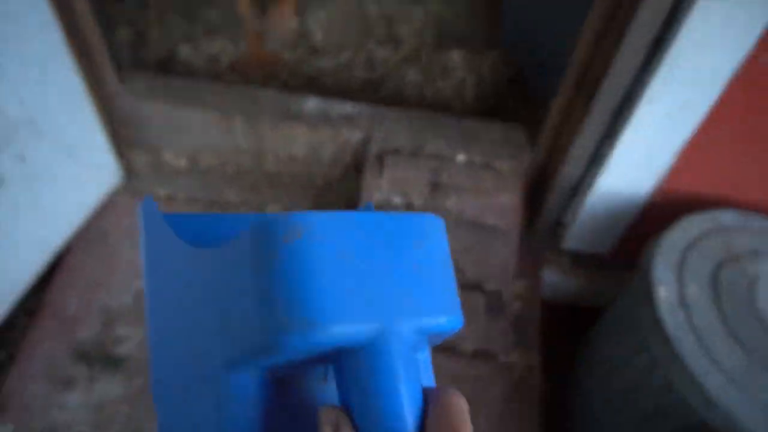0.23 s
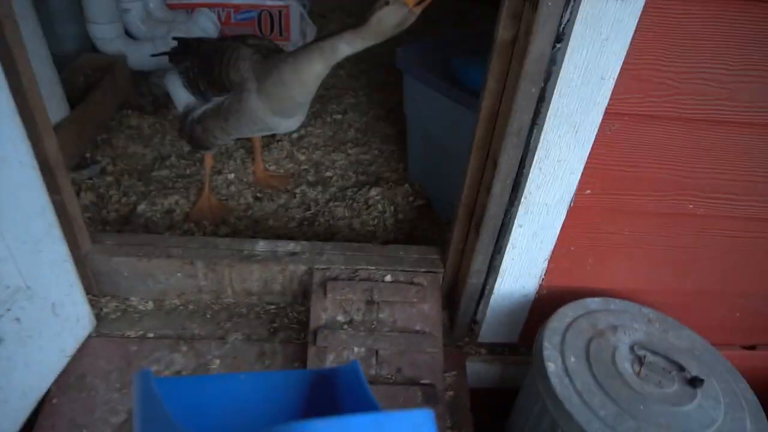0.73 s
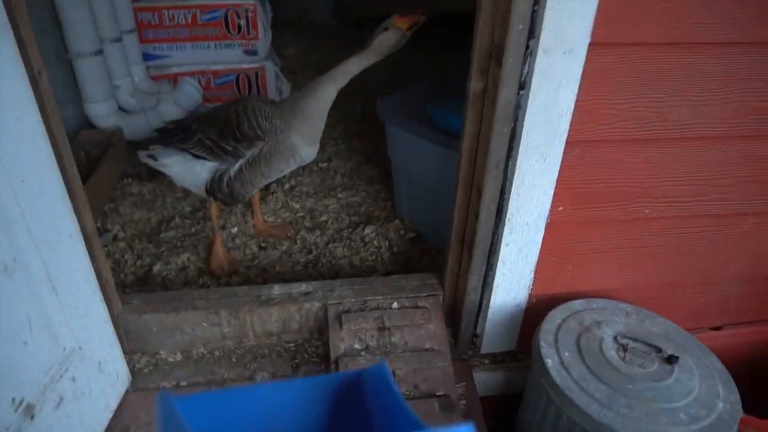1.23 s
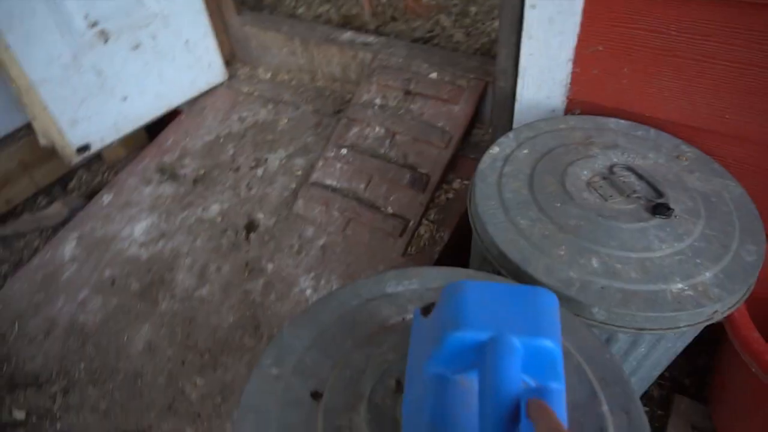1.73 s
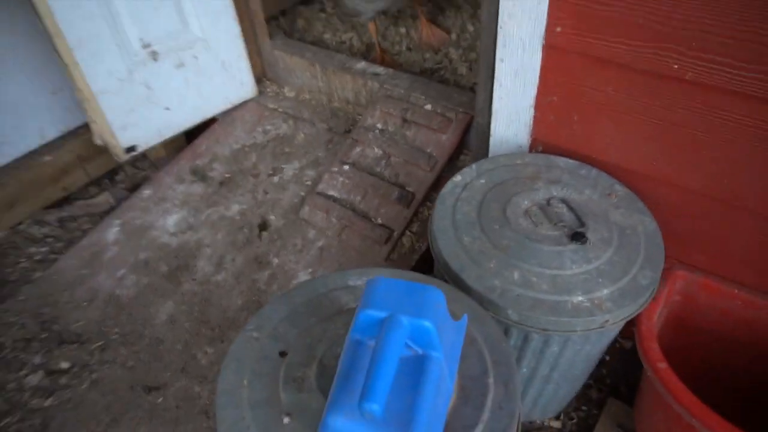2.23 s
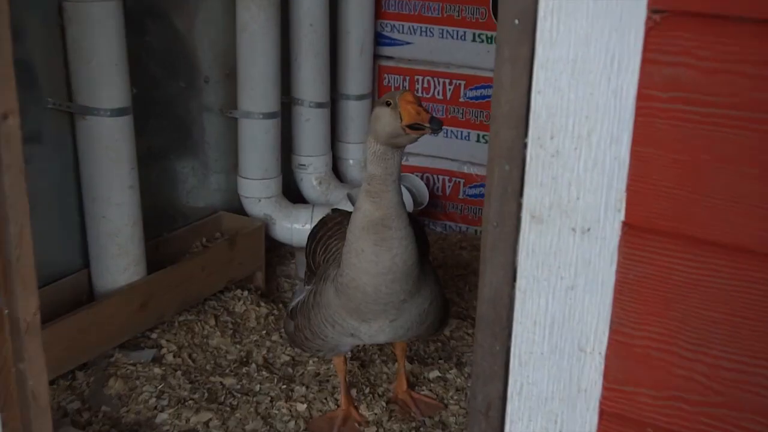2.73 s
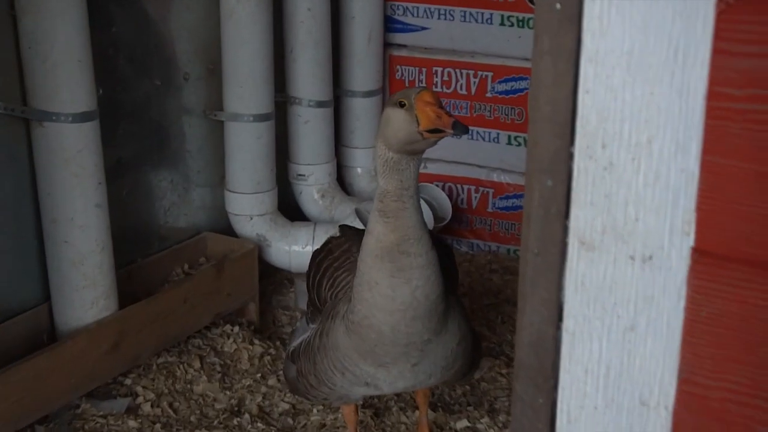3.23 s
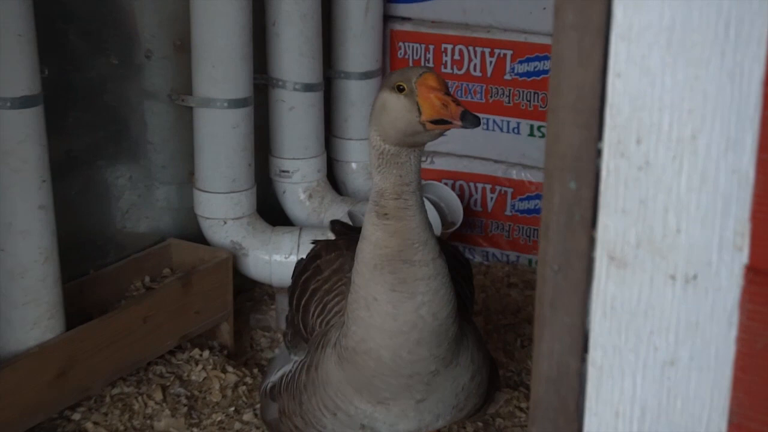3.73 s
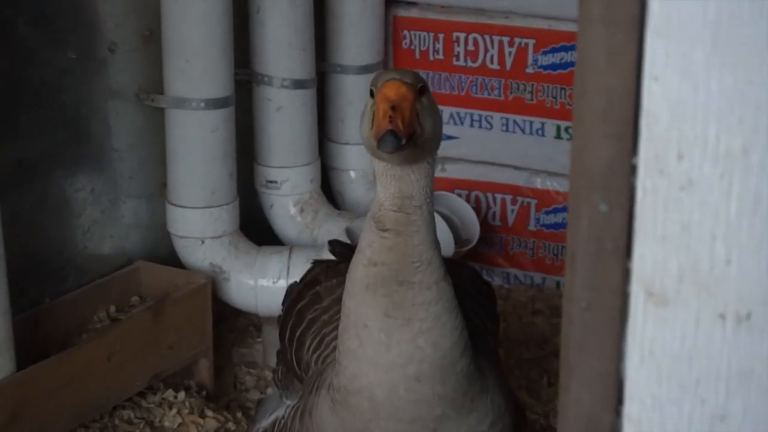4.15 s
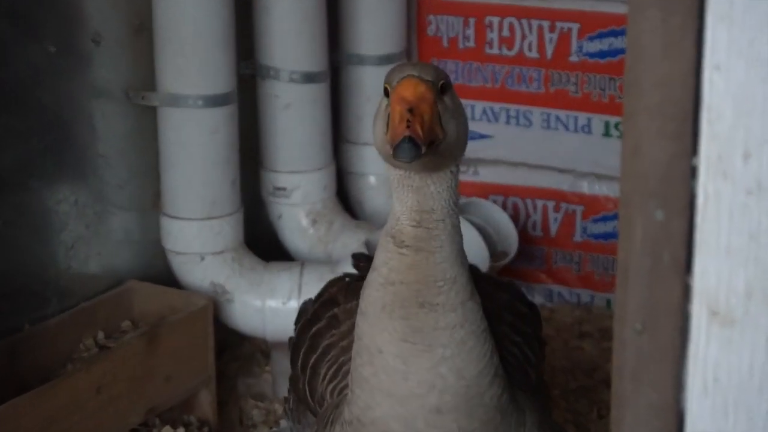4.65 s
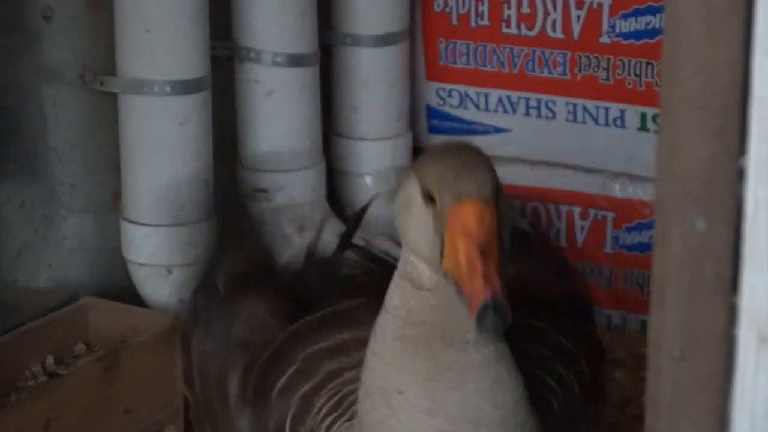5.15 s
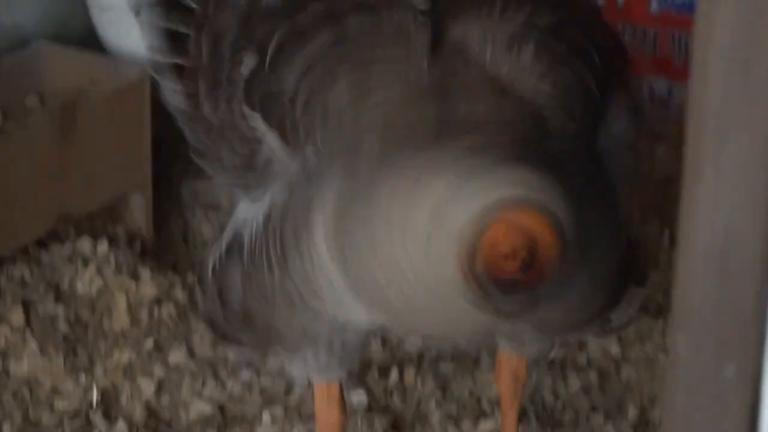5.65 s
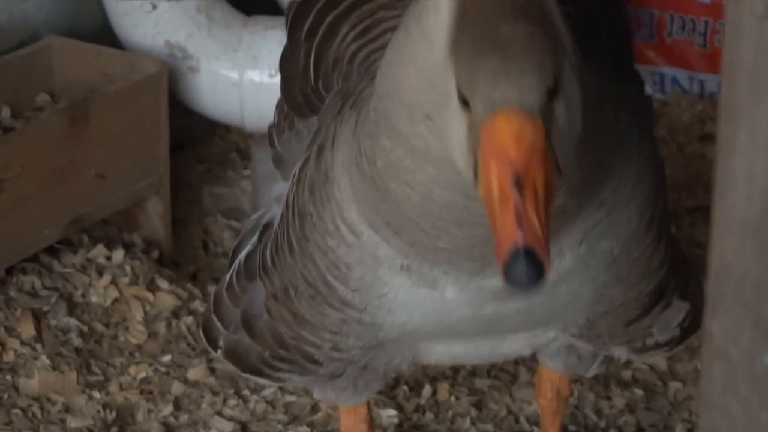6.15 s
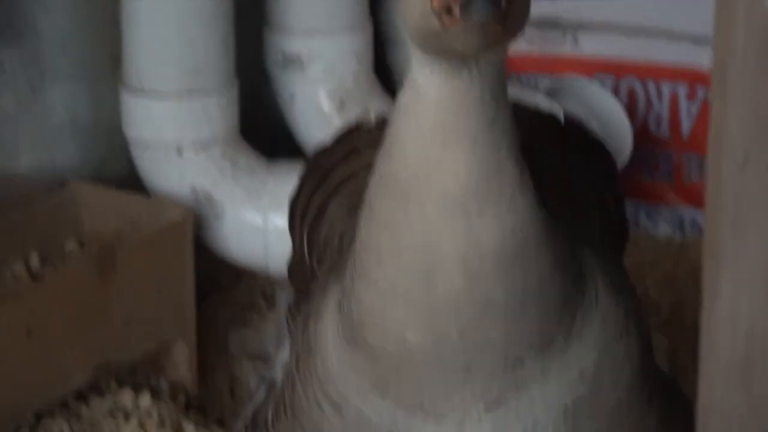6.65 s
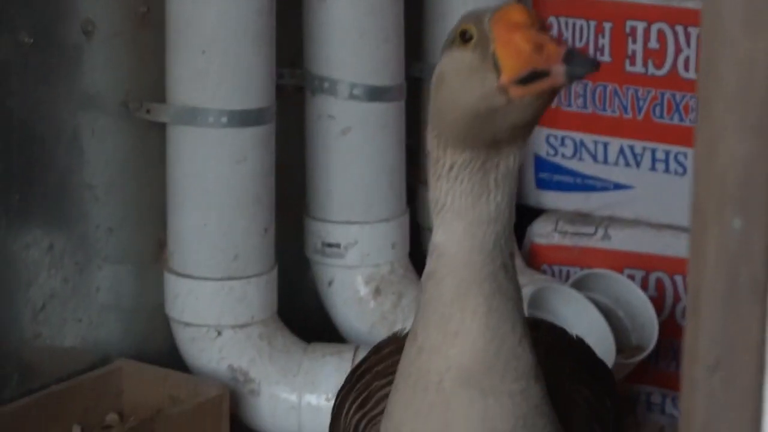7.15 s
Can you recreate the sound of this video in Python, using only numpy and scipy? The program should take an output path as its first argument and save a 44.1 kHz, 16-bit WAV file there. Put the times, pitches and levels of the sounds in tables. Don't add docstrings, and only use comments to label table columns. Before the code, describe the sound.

Close, hoarse goose honks alternate with a second, fainter goose in a small wooden shed while wind thumps the handheld microphone. A plastic scoop slams a metal bin lid, which chatters as it settles, then knocks on wood. A loud high honk follows, then soft steps in shavings and a bird whistle. Two short honks, a burst of quickening feather rustle and wing slaps, light snaps, and a last quiet honk.

```python
import sys
import numpy as np
from scipy import signal
from scipy.io import wavfile
from scipy.ndimage import uniform_filter1d

SR = 44100
rng = np.random.default_rng(int(sys.argv[2]) if len(sys.argv) > 2 else 0)


def log_audio(samples):
    frames = np.atleast_2d(samples).T
    limited = np.clip(frames, -1, 1)
    pcm = np.round(limited * 32767).astype(np.int16)
    wavfile.write(sys.argv[1], SR, pcm)


def magnitude_from_level(level_db):
    exponent = np.asarray(level_db, float) / 20
    return 10 ** exponent


N = 325899
TIME = np.arange(N) / SR

# start in seconds, length in seconds, slow beat in Hz, beat at the end in Hz, level in dB.
NEAR_HONKS = [
    (-.07, 0.11, 156.6, 156.4, -11),
    (.695, 0.13, 149, 145, -14.5),
    (.86, .14, 148.6, 137.7, -16.5),
    (1.224, 0.16, 150.9, 142.4, -16),
    (2.711, 0.14, 193.2, 166, -12),
    (4.068, 0.11, 150.3, 135.8, -13),
    (4.403, 0.093, 152.6, 139.6, -13),
    (7.284, 0.097, 144, 143, -16.5),
]
# start in seconds, length in seconds, slow beat in Hz, beat at the end in Hz, level in dB.
FAR_HONKS = [
    (.383, 0.15, 170.7, 152.8, -19),
    (.62, 0.1, 168.5, 163.7, -24.5),
    (1.03, .18, 177, 183.6, -17.5),
    (1.34, .095, 186.9, 194.5, -17.5),
    (4.306, 0.026, 158, 154, -31.5),
]
NEAR_FLAPS = [5, 5, 5, 5, 4, 5, 5, 5]
FAR_FLAPS = [4, 4, 3, 4, 4]
NEAR_HOARSE = [.45, .2, .28, .38, .21, .27, .27, .3]
FAR_HOARSE = [.38, .45, .26, .38, .1]
NEAR_SHRILL_DB = [3.5, -2, -1.5, 1.2, -4.5, -2.5, -3.5, -7]
FAR_SHRILL_DB = [-7, -11.5, -6.5, -6, -24]
NEAR_SWELL_DB = [-3, -1, 0, -0.36, -2.5, -0.6, 0, 2.5]
FAR_SWELL_DB = [-1, 5.5, 5, 0.2, -8]
# release in seconds, end level in dB, end shrillness in dB.
NEAR_SHAPE = (-0.02, -8, 1.03, 1), (0.0357, -7.5, -6)
FAR_SHAPE = (.05, -10, 1.13, -9.5), (0.0413, -14, 4.9)
# frequency in Hz, width in Hz, level in dB.
NEAR_PIPE = [(757, 220, -6.5), (2055, 400, -10.5), (2310, 490, -12), (2654, 400, -7), (3600, 350, -6),
             (4540, 1700, -17), (5710, 850, -17.5), (8200, 7900, -38)]
FAR_PIPE = [(885, 1210, 0), (2245, 700, -1), (2880, 420, -2), (3420, 350, 3), (4170, 1600, -12),
            (5280, 1700, -17), (8000, 36000, -46)]
# low bill in Hz, its level in dB, high bill in Hz, its level in dB, throat in dB.
NEAR_BILL = [(980, 2, 3140, 0.5, -10.5), (1090, 7, 3200, 2, -13.5), (940, 2.5, 3040, 2, -12.5),
             (980, 3.5, 3220, 2, -11), (945, 9.5, 3200, 2, -4), (980, 6, 3330, 0.5, -3),
             (970, 9.5, 3430, -1.5, 0.5), (950, 9.5, 3330, 1.5, -1.5)]
FAR_BILL = [(1356, 10, 3640, 6, 7), (1450, 11, 3500, -29, 9.3), (1260, 13.4, 2650, 8.5, 3.1),
            (1300, 6.9, 3050, 4, 1.5), (1240, 9.3, 3800, -14, 6.4)]
# low bill glide share, high bill glide share, tongue in Hz, tongue in dB,
# clear start in seconds.
NEAR_MOTION = [(-0.014, 0.017, 1550, -8, .005), (0.038, 0.011, 1730, -2.5, 0.0021),
               (-0.1, 0.072, 1520, -5, 0.0069), (0.19, -0.041, 1460, -2, .003),
               (0.027, -0.013, 1630, -0.5, 0.015), (0.0093, 0.0039, 1590, 0, 0.0066),
               (-0.0027, 0.019, 1570, 0, 0.0067), (0.059, 0.14, 1620, -1.5, 0.013)]
FAR_MOTION = [(0.065, 0.0088, 1650, 4.5, 0.011), (.04, 0.011, 1660, 3, .006), (0.087, 0.1, 1670, 5, 0.0073),
              (0.051, -.02, 1710, -4, 0.0045), (0.021, 0, 1650, 7, .04)]
# time in seconds, peak in dB.
LID_BLOWS = [
    (0.007, -19),
    (1.733, 1),
]
# time in seconds, level in dB against the settling rule.
LID_RATTLE = [(1.758, -1), (1.789, -0.5), (1.81, 0), (1.827, -2), (1.846, 5.5), (1.868, -5.5),
              (1.899, -2.5), (1.928, -3), (1.957, -2.5), (1.992, 0), (2.027, 1.5), (2.052, 2.5),
              (2.099, 1.5), (2.122, -3.5), (2.171, 2), (2.192, -0.5), (2.219, 3.5)]
# frequency in Hz, level in dB, decay by 60 dB in seconds.
LID_MODES = [(258, -16, 0.24), (423, -3.5, 0.15), (541, -13.5, 0.96), (854, -26, 0.94), (1200, -31.5, .12),
             (2880, -21, 0.067), (556, -23.5, 1.05), (3330, -20, 0.053), (3710, -16.5, 0.063)]
# frequency in Hz, width in Hz, level in dB,
# decay by 60 dB in seconds.
LID_CRASH = [(244, 120, -15.5, 0.2), (473, 240, -1, 0.095), (820, 430, -9.5, 0.21), (1355, 115, -6, 0.055),
             (1900, 930, -15.5, 0.16), (2720, 120, -16, 0.12), (3110, 1200, -7.5, 0.095),
             (5150, 820, -18.5, 0.049), (10100, 13000, -20.5, 0.02)]
# time in seconds, peak in dB.
SCOOP_KNOCK = [
    (2.533, 0),
    (2.541, -9),
    (2.549, -13),
    (2.558, -19),
    (2.568, -21),
]
# frequency in Hz, level in dB, decay by 60 dB in seconds.
SCOOP_MODES = [(828, -7, 0.11), (1030, 1, 0.052), (1055, -2.5, 0.072)]
# frequency in Hz, width in Hz, level in dB, decay by 60 dB in seconds.
SCOOP_CRASH = [(546, 300, -15.5, 0.16), (937, 290, 3.5, 0.07), (1530, 420, -6.5, 0.094),
               (2150, 850, -8, 0.044), (3010, 640, -3, 0.058), (4200, 2600, -15.5, 0.15),
               (6950, 5800, -30, 0.062)]
# time in seconds, peak in dB, colour in Hz.
TREADS = [(3.42, -21.5, 1800), (3.58, -27.5, 1270), (3.794, -36, 3460), (3.861, -22, 1170),
          (3.91, -29, 2880), (3.95, -34, 1440), (6.25, -35, 1030), (6.625, -45, 1090), (6.65, -44, 1180),
          (6.77, -26, 3600)]
# time in seconds, peak in dB, colour in Hz.
THUDS = [(4.385, -23, 600), (4.917, -25, 360), (4.94, -29, 377), (4.98, -35, 370), (5.293, -26.5, 800),
         (5.42, -29, 600), (5.495, -22, 820), (5.52, -28, 420), (5.632, -22.5, 950), (5.668, -19.5, 318),
         (5.804, -28, 395), (5.912, -23, 530), (6.012, -23.5, 796), (3.11, -31.5, 1300), (3.16, -28.5, 500)]
# time in seconds, peak in dB, colour in Hz.
QUILLS = [(0.192, -20.5, 2800), (2.492, -57, 3670), (3.157, -24, 4800), (3.179, -27.5, 4770),
          (3.25, -29.5, 2920), (3.318, -32, 3538), (3.345, -29, 5200), (3.365, -38, 5600),
          (4.822, -24.5, 5000), (4.84, -23, 4400), (4.857, -24.5, 3600), (4.92, -25.5, 4130),
          (5.38, -24, 2510), (4.901, -24, 4350), (5.494, -25, 3000), (5.599, -27, 1030), (5.665, -16, 3500),
          (5.767, -20, 3550), (5.816, -24.5, 3520), (5.916, -13, 4334), (6.011, -16, 3500)]
WING_SLAPS_S = [
    5.172,
    5.284,
    5.398,
    5.509,
    5.626,
]
# start in seconds, loudest moment in seconds, end in seconds,
# level in dB, duller body in dB.
RUSTLES = [(0.291, 0.29, 0.42, -51, -11), (2.409, 2.436, 2.46, -55, 7), (2.911, 2.99, 2.96, -38, 4.5),
           (3.301, 3.357, 3.5, -48, 8.5), (3.673, 3.74, 4.03, -41, -4), (3.764, 3.857, 4.16, -55.5, 19),
           (4.778, 4.884, 5.1, -48.5, 5.5), (5.14, 5.657, 6.24, -43.5, 6), (5.273, 5.297, 5.4, -46.5, 7.5),
           (5.392, 5.408, 5.5, -45, 7.5), (5.494, 5.518, 5.6, -40.5, 6), (5.608, 5.67, 5.72, -41, 7),
           (5.903, 5.92, 6.0, -43.5, 11), (6.006, 6.05, 5.995, -35, 9.5), (6.607, 6.764, 6.73, -53, -21)]
# frequency in Hz, level in dB per Hz.
RUSTLE_COLOUR = [(180, -21.5), (300, 8), (350, -10.5), (421, -3.5), (857, -8), (1910, -8), (5550, -5),
                 (10900, -17.5), (12000, -26), (15600, -56), (22000, -120)]
# start in seconds, length in seconds, start in Hz, end in Hz, level in dB.
WHISTLES = [
    (3.672, 0.29, 3420, 3534, -29.5),
    (3.757, 0.29, 3440, 3530, -49),
    (3.984, 0.22, 3470, 3480, -58),
    (3.328, .085, 980, 2040, -54),
    (6.03, 0.23, 3520, 3340, -73),
    (6.697, 0.061, 3976, 4060, -62),
    (6.763, 0.027, 4120, 4070, -49.5),
    (6.958, .13, 2730, 2800, -53.5),
    (7.128, 0.2, 3325, 3130, -49.5),
]
OVERTONES_DB = [8.5, -6, -10]
# time in seconds, level in dB.
HAND_SWAY = [(0.0, -13.5), (0.7, -18), (1.6, -27.5), (3.43, -16), (4.5, -25), (5.3, -24), (6.7, -14),
             (7.39, -16)]
# time in seconds, level in dB.
WIND_BUFFET = [(0.0, -28.5), (0.31, -17.5), (0.68, -24.5), (1.089, -43), (1.63, -14.5), (1.849, -30),
               (2.85, -47.5), (3.79, -52), (4.34, -39), (4.8, -60), (5.58, -41.5), (6.42, -50), (6.7, -35),
               (7.39, -60)]
# start in seconds, end in seconds, peak in dB, push length in seconds.
GUSTS = [
    (0.293, 0.384, -0.5, 0.013),
    (1.473, 1.708, -3, 0.0091),
]
# time in seconds, peak in dB, length in seconds.
POPS = [
    (0.328, -34, .0004),
    (1.628, -20.5, 0.00071),
    (1.708, -31, 0.0013),
    (2.532, -19, 0.00093),
]
# time in seconds, level in dB.
YARD_LEVEL = [(0.0, -52.5), (0.82, -47), (1.25, -52), (1.42, -63.5), (1.93, -41), (2.45, -54.5),
              (2.68, -46.5), (7.39, -46)]
# frequency in Hz, level in dB per Hz.
YARD_COLOUR = [(53, -20), (90, -22.5), (125, 12), (166, -0.5), (226, -3), (283, -11.5), (362, -1),
               (772, -9), (856, -9.5), (1340, -11), (2240, -20), (3890, -23), (12000, -39.5), (15600, -75),
               (22000, -120)]
# frequency in Hz, width in Hz, level in dB.
MOTOR_HUM = [
    (113.2, 15, -47),
    (354.6, 19, -57.5),
]

THROAT_HZ, THROAT_WIDTH_HZ = 544, 290
BILL_WIDTH_HZ, BILL_HIGH_WIDTH_HZ, TONGUE_WIDTH_HZ = 237, 374, 253
THROAT_GROWS_DB = 3
BILL_OPENS = 0.028
FILL_DB = -26
SWELL_BRIGHTENS = 0.66
KNOT = 900
RATTLE_DB, RATTLE_SETTLED_DB, RATTLE_SETTLE_S = -5.5, -28, 0.21
SLAP_DB, SLAP_LAG_DB, SLAP_HZ = -19.5, -7.5, 904
TREAD_CRISP_DB, QUILL_CRISP_DB, SLAP_CRISP_DB = -37.5, -1, -7.5
SNAP_RISE_S = 0.0011
RUSTLE_START_DB, RUSTLE_END_DB = -5.5, -25.5
WHISTLE_PEAK_SHARE, WHISTLE_START_DB, WHISTLE_FADES_TO_DB = 0.21, -15.5, -72.5
PUSH_GAP_S, PUSH_SCATTER_DB = .027, 1.5
SHED_T60_S, SHED_DB, WALL_CUT_HZ = 0.2, -15.5, 34000


def rms_one(x):
    return x / np.sqrt(np.mean(x ** 2) + 1e-20)


def in_time(rows):
    s, *columns = np.transpose(rows)
    return [np.interp(TIME, s, c) for c in columns]


def gate(rows, rise_s, fall_s):
    rise = (TIME - rows[0][0]) / rise_s
    fall = (rows[-1][0] - TIME) / fall_s + 1
    return np.clip(np.minimum(rise, fall), 0, 1)


def band(x, low_hz, high_hz, order=2):
    return signal.sosfilt(signal.butter(order, [low_hz, high_hz], "band", fs=SR, output="sos"), x)


def drift(rate):
    knots = np.arange(0, N / SR + 1, .5 / rate)
    return np.interp(TIME, knots, rng.standard_normal(len(knots))) * np.sqrt(1.5)


def resonate(x, hz, width_hz):
    r = np.exp(-np.pi * width_hz / SR)
    top = [(1 - r * r) / 2, 0, (r * r - 1) / 2]
    bottom = [1, -2 * r * np.cos(2 * np.pi * hz / SR), r * r]
    once = signal.lfilter(top, bottom, x + 1e-18)
    return signal.lfilter(top, bottom, once + 1e-18)


def coloured(x, spectrum, patchy_db):
    out, edges = 0, 70 * 2 ** np.arange(0, 8, .5)
    points_hz, points_db = np.transpose(spectrum)
    for k, (low, high) in enumerate(zip(edges, edges[1:])):
        level_db = np.interp(np.log(low * high) / 2, np.log(points_hz), points_db)
        out = out + magnitude_from_level(level_db + patchy_db * drift(12)) * band(x[k % 2], low, high)
    return rms_one(out)


def honks(rows, shrill, swell, shape):
    (attack_s, start_db, start_share, start_shrill_db), (release_s, end_db, end_shrill_db) = shape
    calls = []
    for (s, length, hz, end_hz, db), shrill_db, swell_db in zip(rows, shrill, swell):
        held_db, held_shrill_db = db + swell_db, shrill_db + SWELL_BRIGHTENS * swell_db
        calls.append([(s, start_share * hz, db + start_db, shrill_db + start_shrill_db),
                      (s + min(attack_s, .3 * length), hz, db, shrill_db),
                      (s + max(length - release_s, length / 2), hz, held_db, held_shrill_db),
                      (s + length, end_hz, held_db + end_db, held_shrill_db + end_shrill_db)])
    return calls


def membrane(phase, beat_hz, broken, count, hoarse, weak):
    n = len(phase)
    k = np.arange(1, int(phase[-1] * count))
    when = np.interp(k / count, phase, np.arange(n))
    at, luck = when.astype(int), np.clip(rng.standard_normal((400, 4)), -1.6, 1.6)
    memory = np.r_[1, np.zeros(count - 1), -.94]
    wander = signal.lfilter([.35], memory, luck[:, 2:], axis=0)[100:100 + len(k)]
    strong = k % count == 0
    size = np.where(strong, 1, weak + .2 * wander[:, 0]) + hoarse * luck[:len(k), 0]
    slip = .13 * wander[:, 1] * ~strong + .16 * hoarse * luck[:len(k), 1]
    when = np.clip(when + broken[at] * slip * SR / (beat_hz[at] * count), 0, n - 2)
    size = .5 + broken[at] * (size - .5)
    flap = np.zeros(n)
    np.add.at(flap, when.astype(int), size * (1 - when % 1))
    np.add.at(flap, when.astype(int) + 1, size * (when % 1))
    puff = signal.lfilter([1], [1, -.97], np.abs(flap)) * rng.standard_normal(N // 20)[:n]
    return band(flap + .18 * hoarse * broken * puff, 430, 15000, order=3), puff


def vocal_tract(source, open_share, pipe, bill, motion, flicker_db):
    low_hz, low_db, high_hz, high_db, throat_db = bill
    low_glide, high_glide, tongue_hz, tongue_db, _ = motion
    tract = sorted([row + (BILL_OPENS,) for row in pipe] + [
        (THROAT_HZ, THROAT_WIDTH_HZ, throat_db, 0),
        (low_hz, BILL_WIDTH_HZ, low_db, low_glide),
        (tongue_hz, TONGUE_WIDTH_HZ, tongue_db, BILL_OPENS / 2),
        (high_hz, BILL_HIGH_WIDTH_HZ, high_db, high_glide)])
    n = len(source)
    knots = flicker_db * rng.standard_normal((len(tract), 16))
    knots[0] += THROAT_GROWS_DB * np.clip(np.arange(16) * KNOT / (n - .06 * SR), 0, 1) ** 2
    stages = (-1, -.5, 0, .5, 1)
    shares = [np.clip(1 - 2 * np.abs(2 * open_share - 1 - stage), 0, 1) for stage in stages]
    parts = []
    for i, (hz, width, db, glide) in enumerate(tract):
        ring = sum(resonate(share * source, hz * (1 + glide * stage), width) for share, stage in zip(shares, stages))
        level_db = db + np.interp(np.arange(n) / KNOT, np.arange(16), knots[i])
        parts.append((-1) ** i * magnitude_from_level(level_db) * ring)
    return sum(parts[:4]), sum(parts[4:])


def goose(calls, flaps, hoarseness, bills, motions, pipe, weak, flicker_db, chest_db, chest_hz, smear):
    out = np.zeros(N)
    for call, count, hoarse, bill, motion in zip(calls, flaps, hoarseness, bills, motions):
        scatter = rng.standard_normal(220) * (rng.random(220) < .08) * np.exp(-np.arange(220) / 110) * smear
        scatter[0] = 1
        a, b = max(int(call[0][0] * SR), 0), min(int((call[-1][0] + .06) * SR), N)
        beat_hz, level_db, shrill_db = [c[a:b] for c in in_time(call)]
        age = TIME[a:b] - call[0][0] + (0 if a else 1)
        clean_s = motion[-1]
        broken = np.clip(age / max(clean_s, 1e-3) - .6, 0, 1)
        phase = np.cumsum(beat_hz * (1 - 0.0907 * np.exp(-age / 0.01125))) / SR
        source, puff = membrane(phase, beat_hz, broken, count, hoarse, weak)
        open_share = np.clip(age / (call[-1][0] - call[0][0]), 0, 1)
        low, high = vocal_tract(source, open_share, pipe, bill, motion, flicker_db)
        high = high + magnitude_from_level(FILL_DB) * broken * band(puff, 1230, 3680)
        high = signal.fftconvolve(high, scatter)[:b - a]
        low_even, high_even = [np.sqrt(uniform_filter1d(p ** 2, size=1200) + 1e-12) for p in (low, high)]
        chest = magnitude_from_level(chest_db - ((beat_hz - chest_hz) / 12) ** 2) * broken * np.sin(2 * np.pi * phase)
        voice = low / low_even + magnitude_from_level(shrill_db) * high / high_even + chest
        out[a:b] += magnitude_from_level(level_db) * gate(call, .008 if a else 1e-4, 0.0094)[a:b] * voice
    return out


def lid_hits():
    s, db = np.transpose(LID_RATTLE)
    settle = np.exp(-(s - s[0]) / RATTLE_SETTLE_S)
    return LID_BLOWS + list(zip(s, db + RATTLE_SETTLED_DB + (RATTLE_DB - RATTLE_SETTLED_DB) * settle))


def struck(hits, modes, crash, scatter_db):
    at, peak_db = [round(s * SR) for s, db in hits], np.array(hits)[:, 1]
    out, blows = np.zeros(N), np.zeros(N)
    for hz, level_db, t60 in modes:
        blows[at] = magnitude_from_level(peak_db + level_db + scatter_db * rng.standard_normal(len(at)))
        r, w = magnitude_from_level(-60 / (t60 * SR)), 2 * np.pi * hz / SR
        out += signal.lfilter([0, np.sin(w)], [1, -2 * r * np.cos(w), r * r], blows + 1e-18)
    for hz, width_hz, level_db, t60 in crash:
        blows[at] = magnitude_from_level(peak_db + level_db + scatter_db * rng.standard_normal(len(at)))
        fade = signal.lfilter([1], [1, -magnitude_from_level(-60 / (t60 * SR))], blows + 1e-18)
        fade = signal.lfilter([.03], [1, -.97], fade)
        out += fade * rms_one(resonate(rng.standard_normal(N), hz, width_hz))
    return out


def snaps():
    out, t = np.zeros(N), np.arange(2000) / SR
    dull = [row + (TREAD_CRISP_DB,) for row in TREADS + THUDS]
    crisp = [row + (QUILL_CRISP_DB,) for row in QUILLS]
    slaps = [(s, SLAP_DB + SLAP_LAG_DB / 2 ** k, SLAP_HZ, SLAP_CRISP_DB) for k, s in enumerate(WING_SLAPS_S)]
    envelope = (np.exp(-t / 0.0068) + 0.48 * np.exp(-t / 0.029)) * (1 - np.exp(-t / SNAP_RISE_S))
    for s, peak_db, hz, crisp_db in dull + crisp + slaps:
        burst = rng.standard_normal(len(t)) * envelope
        edge = band(burst * np.exp(-t / .012), 500, 11000, order=1)
        burst = resonate(burst, hz, .6 * hz) + .6 * magnitude_from_level(crisp_db) * edge
        out[round(s * SR):][:len(t)] += magnitude_from_level(peak_db - 6.5) * burst / np.abs(burst).max()
    return out


def rustle():
    sizes = magnitude_from_level(2.0 * np.minimum(rng.exponential(1, (2, N)), 5)) * rng.choice([-1, 1], (2, N))
    grains_per_s = 5000 * magnitude_from_level(5.0 * drift(40))
    grains = sizes * (rng.random((2, N)) < grains_per_s / SR) + 1e-18
    noise = coloured(grains, RUSTLE_COLOUR, patchy_db=1.5)
    noise = noise / np.std(band(noise, 3400, 7000))
    dull = signal.sosfilt(signal.butter(2, 3000, fs=SR, output="sos"), noise)
    out = 0
    for start, loudest, end, db, body_db in RUSTLES:
        rows = [(start, db + RUSTLE_START_DB), (loudest, db), (end, db + RUSTLE_END_DB)]
        level_db, = in_time(rows)
        out = out + gate(rows, 0.013, 0.017) * magnitude_from_level(level_db) * (noise - dull + magnitude_from_level(body_db) * dull)
    return out


def bird():
    out = 0
    for s, length, start_hz, end_hz, peak_db in WHISTLES:
        stages = [(0, WHISTLE_START_DB), (WHISTLE_PEAK_SHARE, 0), (1, WHISTLE_FADES_TO_DB - peak_db)]
        rows = [(s + share * length, start_hz + share * (end_hz - start_hz), peak_db + db) for share, db in stages]
        hz, level_db = in_time(rows)
        phase = 2 * np.pi * np.cumsum(hz * (1 + .004 * drift(150))) / SR
        force = np.clip((level_db + 54) / 12, 0, 1)
        tone = sum(magnitude_from_level(db) * force ** k * np.sin((k + 1) * phase) for k, db in enumerate(OVERTONES_DB))
        out = out + np.sqrt(2) * gate(rows, 0.0024, 0.07) * magnitude_from_level(level_db + 3.2 * drift(80)) * tone
    return out


def shed(x):
    out, dull = np.zeros(N), np.exp(-2 * np.pi * WALL_CUT_HZ / SR)
    for k, lag in enumerate((rng.uniform(.008, .03, 8) * SR).astype(int)):
        loop, gain, state = x.copy(), magnitude_from_level(-60 * lag / SR / SHED_T60_S), [0.]
        for i in range(lag, N, lag):
            back, state = signal.lfilter([gain * (1 - dull)], [1, -dull], loop[i - lag:i], zi=state)
            loop[i:i + lag] += back[:N - i]
        out += (loop - x) * (-1) ** k
    return out


def wind():
    out = 0
    for level_db, (low, high) in zip(in_time(HAND_SWAY) + in_time(WIND_BUFFET), [(6, 17.0), (22, 67)]):
        noise = band(rng.standard_normal(N + SR), low, high, order=3)[SR:]
        out = out + magnitude_from_level(level_db) * noise / np.sqrt(uniform_filter1d(noise ** 2, size=9000))
    for start, end, peak_db, length in GUSTS:
        luck = rng.standard_normal((20, 2))
        s = start + np.cumsum(PUSH_GAP_S * magnitude_from_level(2 * luck[:, 0]))
        swell = np.sin(np.pi * np.clip((s - start) / (end - start), 0, 1) ** 1.13)
        size = swell * magnitude_from_level(peak_db + PUSH_SCATTER_DB * luck[:, 1])
        near = slice(int((start - .1) * SR), int((end + .1) * SR))
        u = (TIME[near, None] - s) / length
        push = np.exp(-(3.12 * u) ** 2) - 0.28 * np.exp(-(1.0 * (u - 1.1)) ** 2)
        out[near] += size @ np.transpose(push)
    for s, peak_db, length in POPS:
        u = (TIME - s) / length
        out += magnitude_from_level(peak_db) * u * np.exp(-u ** 2)
    return out


def yard():
    hush = coloured(rng.standard_normal((2, N)), YARD_COLOUR, patchy_db=1.1)
    hush = hush / np.std(band(hush, 200, 3000))
    hum = sum(magnitude_from_level(db) * rms_one(resonate(rng.standard_normal(N), hz, width)) for hz, width, db in MOTOR_HUM)
    level = magnitude_from_level(in_time(YARD_LEVEL)[0])
    return level * (hush + hum / np.median(level))


def scene():
    near = goose(honks(NEAR_HONKS, NEAR_SHRILL_DB, NEAR_SWELL_DB, NEAR_SHAPE), NEAR_FLAPS, NEAR_HOARSE, NEAR_BILL,
                 NEAR_MOTION, NEAR_PIPE, weak=.12, flicker_db=3.0, chest_db=-18, chest_hz=143, smear=0.3)
    far = goose(honks(FAR_HONKS, FAR_SHRILL_DB, FAR_SWELL_DB, FAR_SHAPE), FAR_FLAPS, FAR_HOARSE, FAR_BILL,
                FAR_MOTION, FAR_PIPE, weak=.2, flicker_db=4.5, chest_db=-22.5, chest_hz=166, smear=0.67)
    lid = magnitude_from_level(-10.5) * struck(lid_hits(), LID_MODES, LID_CRASH, scatter_db=2.5)
    scoop = magnitude_from_level(-16.0) * struck(SCOOP_KNOCK, SCOOP_MODES, SCOOP_CRASH, scatter_db=3.5)
    inside = near + far + lid + scoop + snaps() + rustle() + bird()
    return (inside + magnitude_from_level(SHED_DB) * shed(inside + 1e-18) + wind() + yard())[None]


def top_cut(x):
    return signal.sosfilt(signal.butter(12, 12200, fs=SR, output="sos"), x)


def record(dry):
    cut = signal.sosfilt(signal.cheby2(8, 32, 12700, fs=SR, output="sos"), dry)
    rounded = cut / (1 + np.abs(cut) ** 9) ** (1 / 9)
    return top_cut(rounded)


dry = scene()
out = record(dry)
log_audio(out)
```